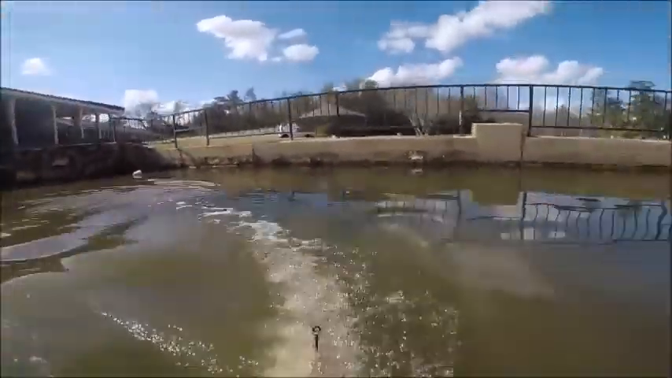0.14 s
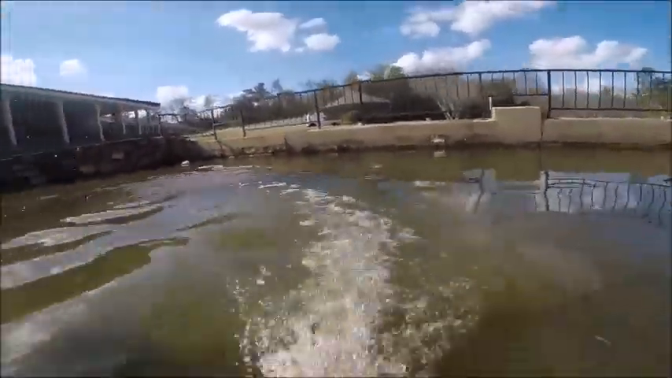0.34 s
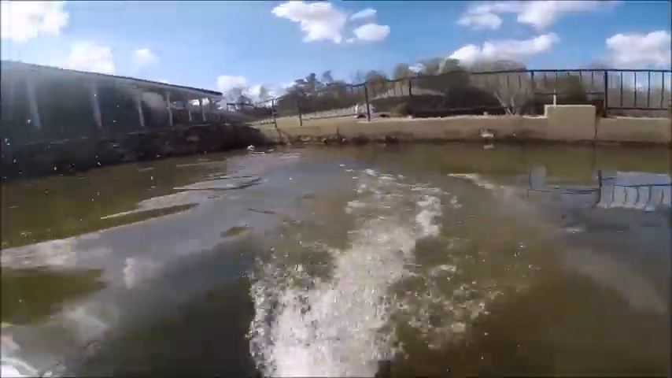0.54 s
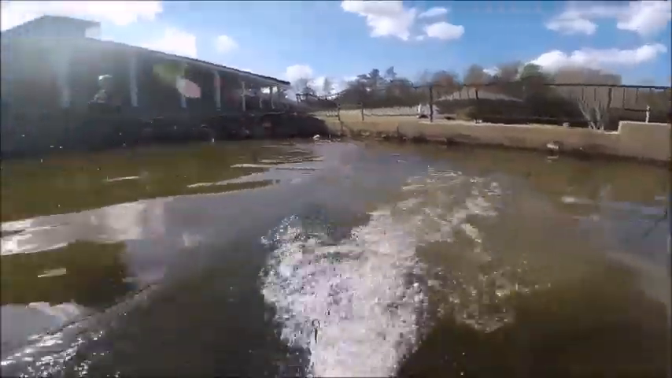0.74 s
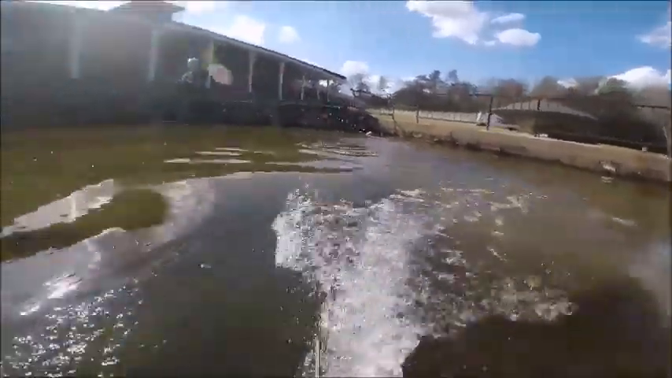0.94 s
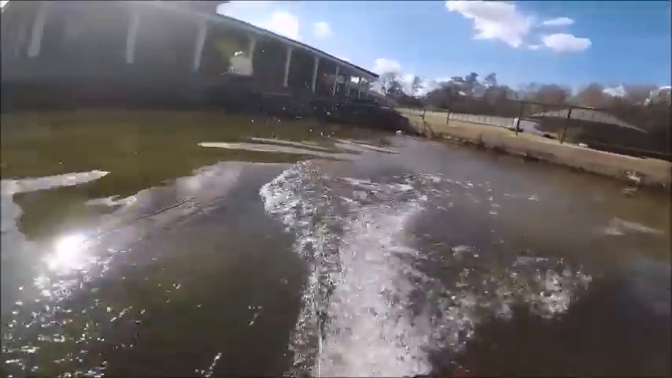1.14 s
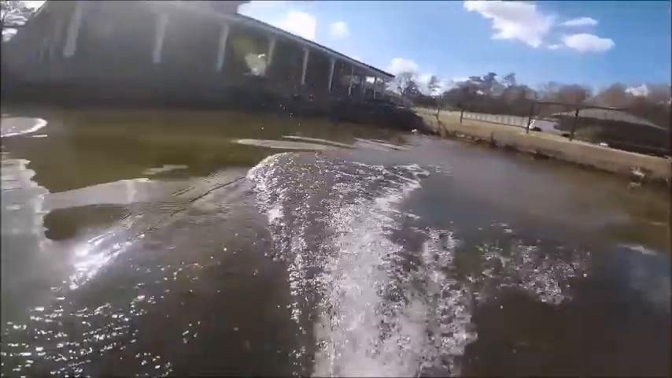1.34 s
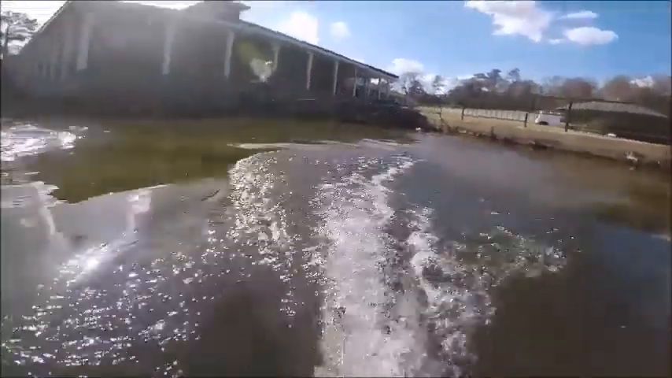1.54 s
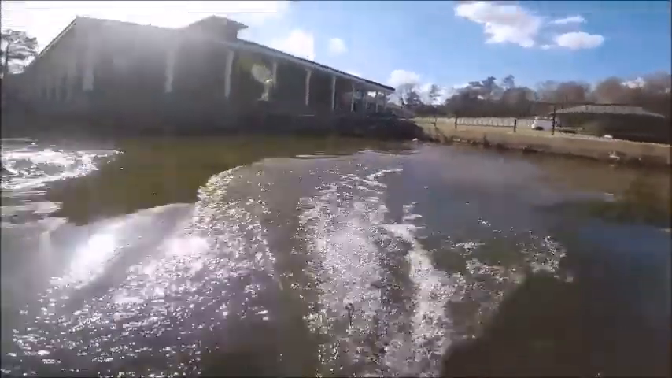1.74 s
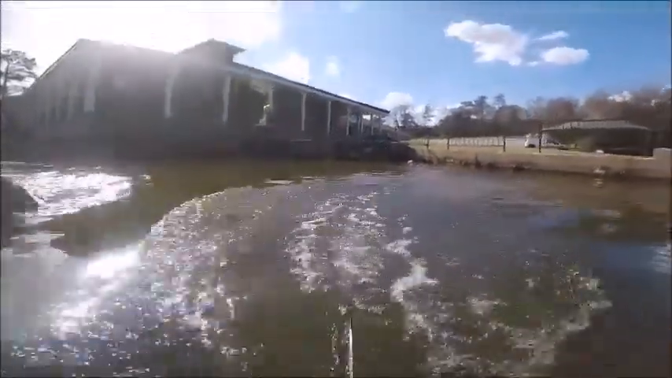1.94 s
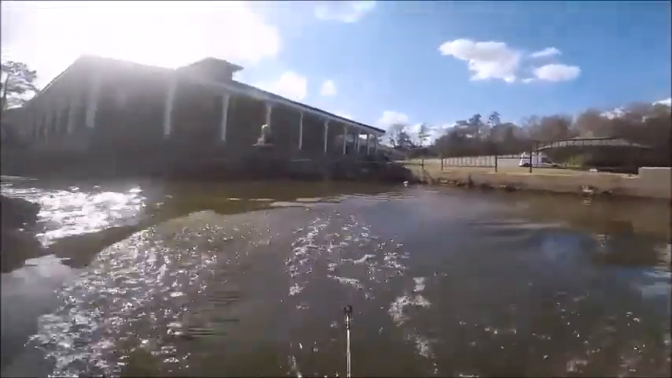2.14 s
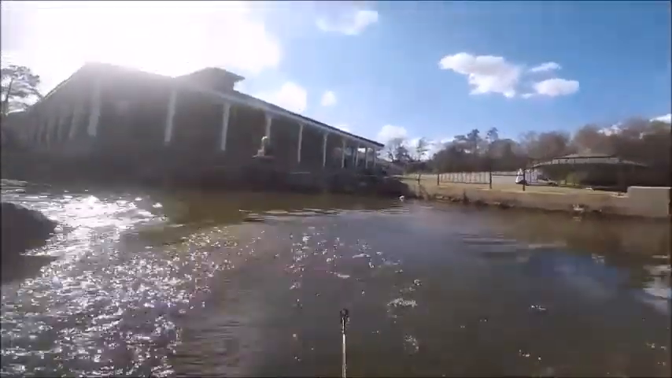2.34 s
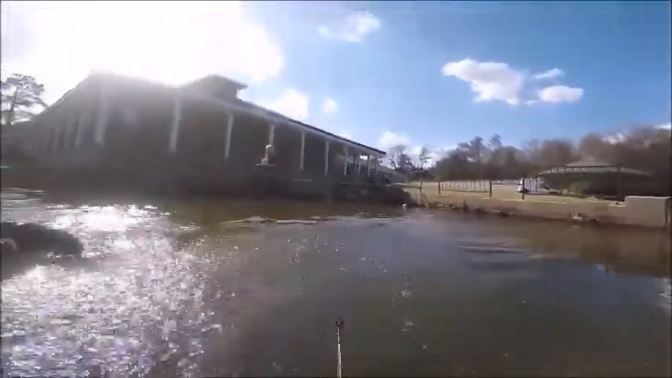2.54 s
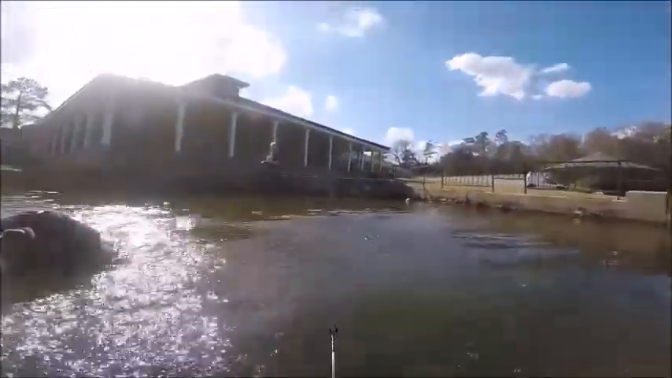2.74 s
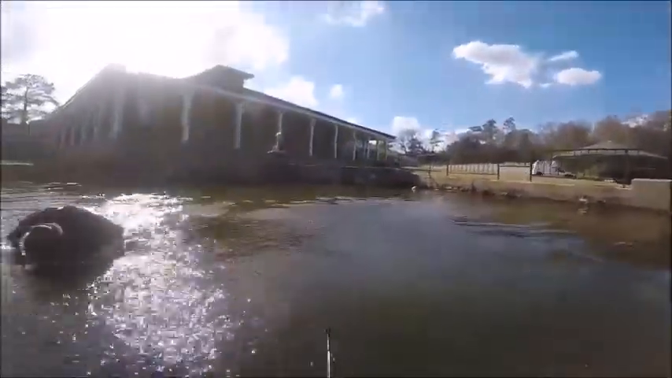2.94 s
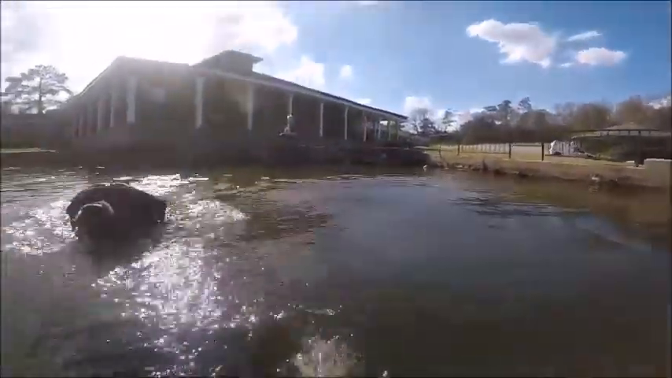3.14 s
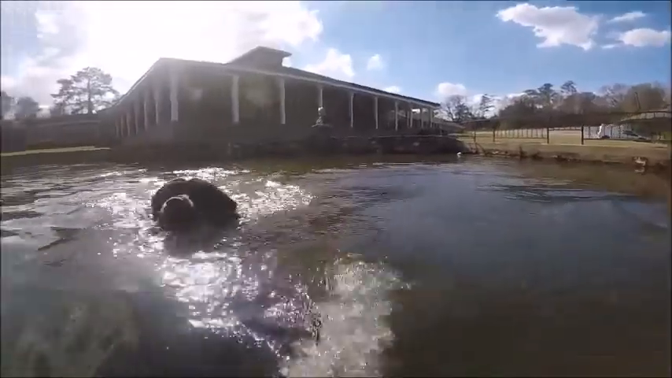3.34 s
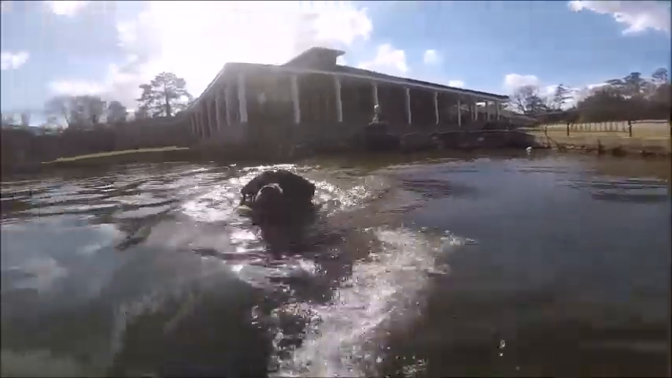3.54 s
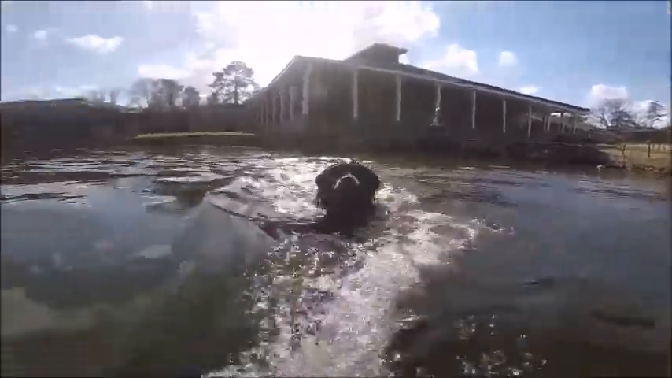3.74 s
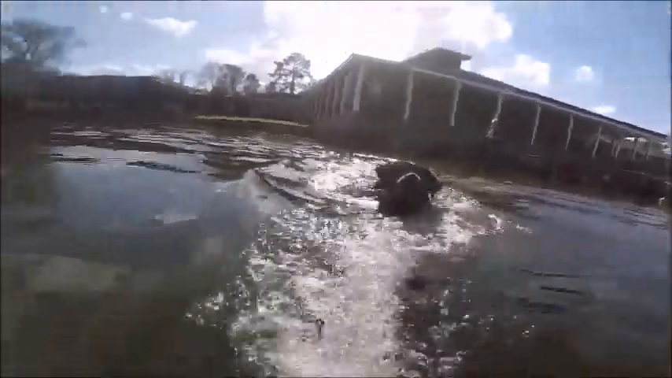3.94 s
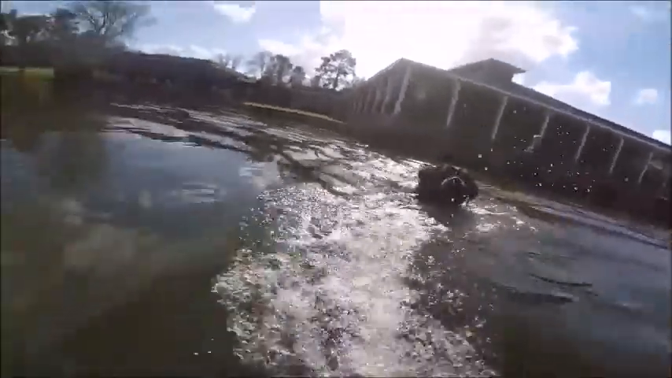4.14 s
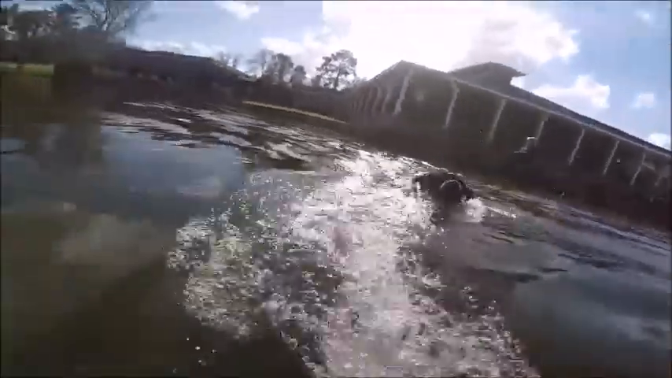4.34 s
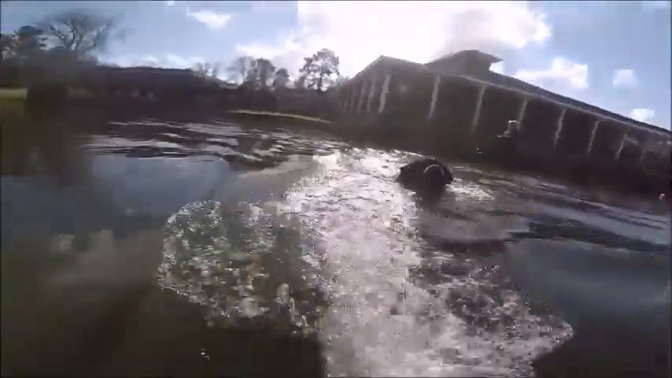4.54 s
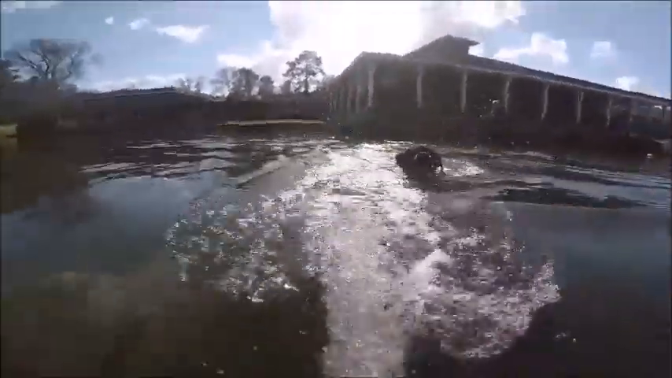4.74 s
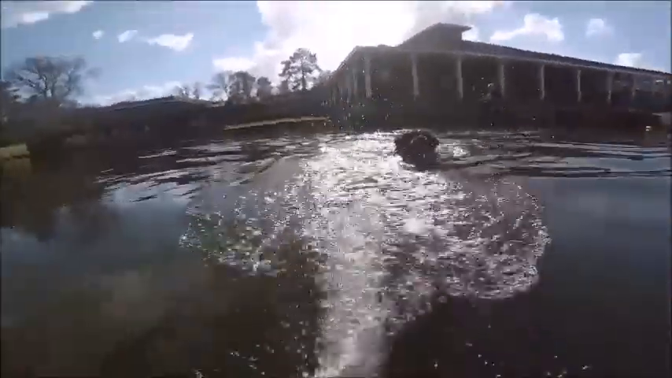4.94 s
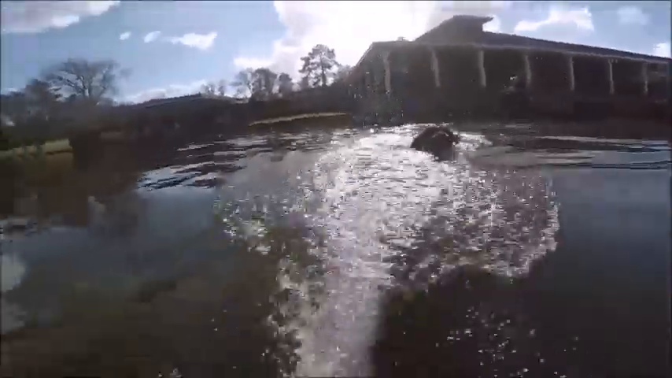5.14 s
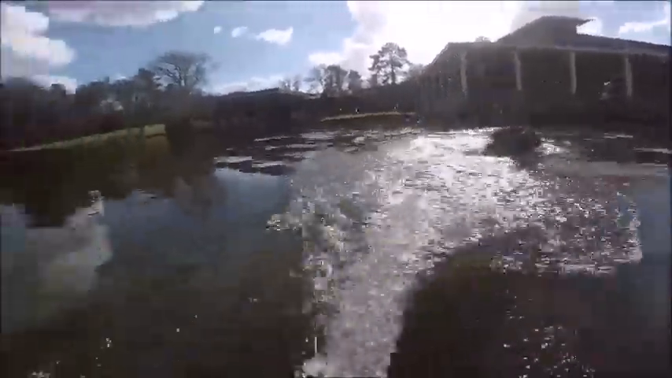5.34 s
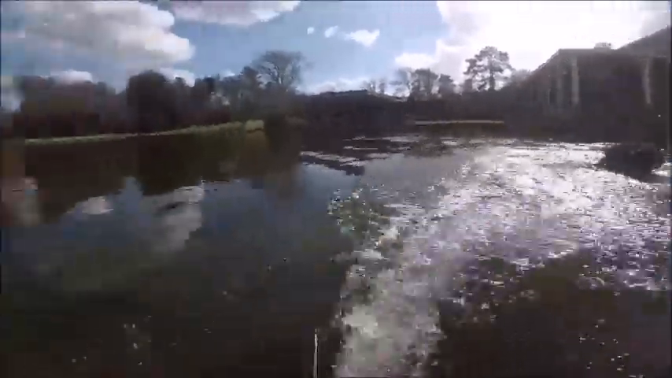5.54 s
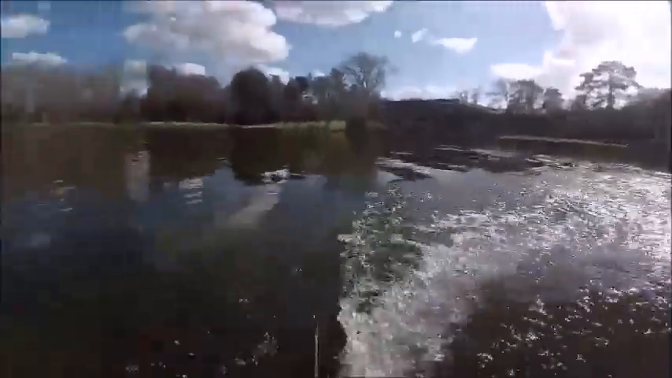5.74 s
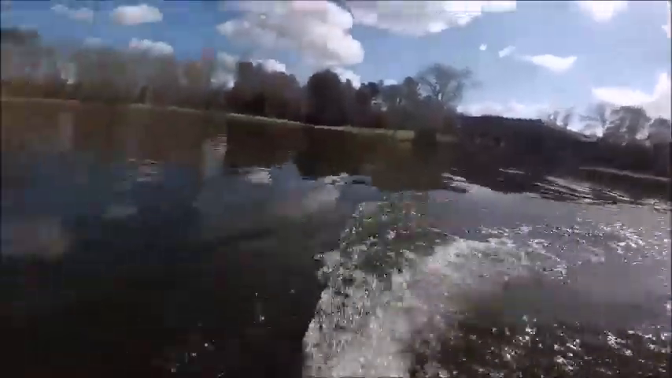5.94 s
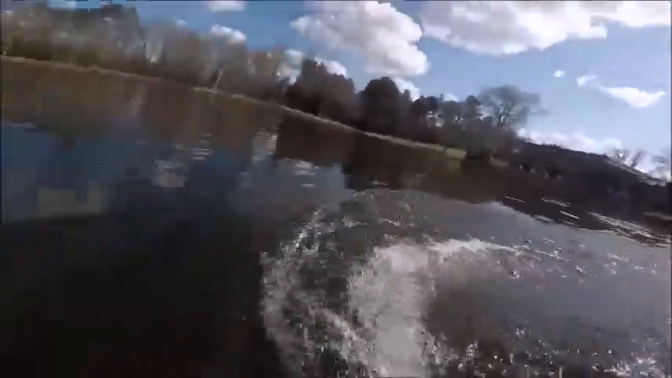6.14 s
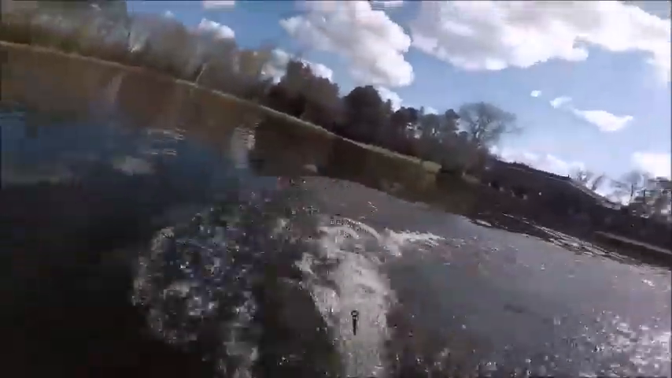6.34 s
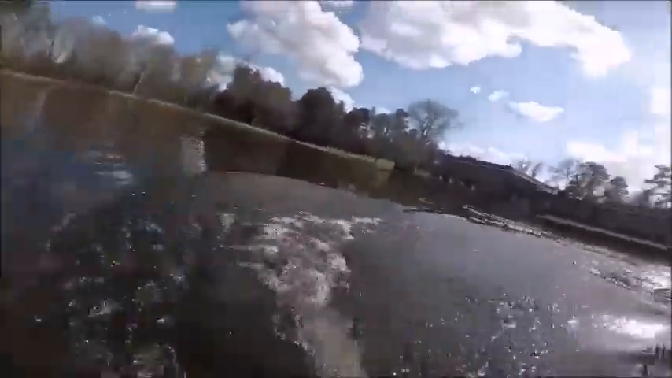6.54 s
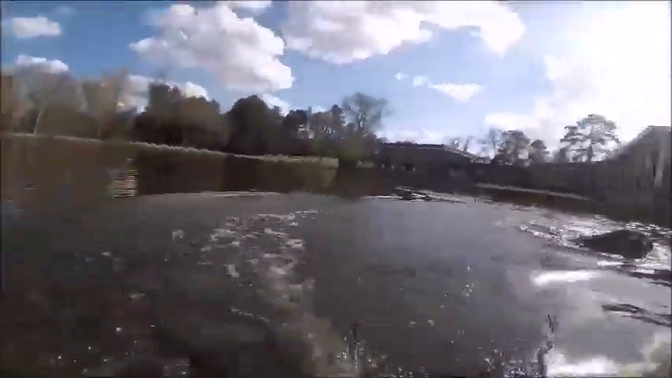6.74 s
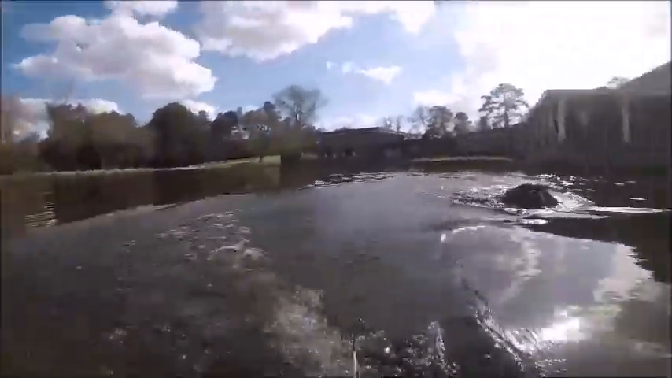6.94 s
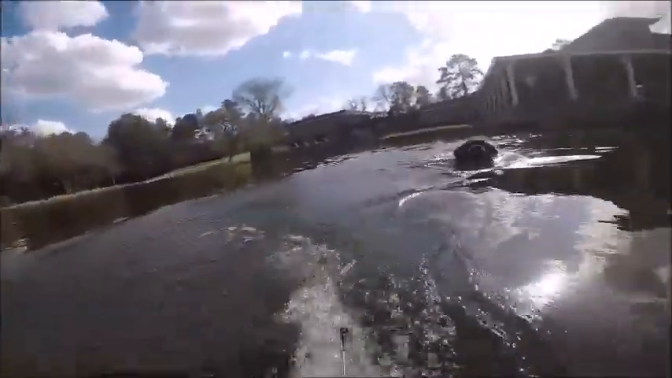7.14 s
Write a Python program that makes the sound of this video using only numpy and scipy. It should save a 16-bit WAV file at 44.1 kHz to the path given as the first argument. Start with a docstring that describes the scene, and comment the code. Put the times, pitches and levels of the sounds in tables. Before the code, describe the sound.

A low, buzzing electric hum shakes a hollow little hull while water churns beneath and a soft wake hisses. After nearly two seconds the throttle closes, leaving quiet lapping and small drips. Around three seconds the motor returns with a loud splash and gurgling growl, dips briefly, drones on, weakens amid pattering drops, and surges at the end. Close on-board microphone, outdoors, dry.

```python
"""A small electric model boat, heard from its own deck. The propeller bites at once, and the shaft shakes the
hull into a low drone while water churns underneath and a hissing wake streams away. The throttle closes and
the boat coasts through lapping ripples; it bites again with a splash, air growling in the propeller.
Last it labours through a turn, with spray pattering on the deck as wet ticks and ringing bubbles."""
import sys
import numpy as np
from scipy import signal
from scipy.fft import rfft, irfft, next_fast_len
from scipy.io import wavfile
from scipy.ndimage import uniform_filter1d, minimum_filter1d, map_coordinates

SR = 44100
rng = np.random.default_rng(int(sys.argv[2]) if len(sys.argv) > 2 else 0)


def master_out(mix):
    """Clip the mix to full scale and print it as 16-bit PCM to the path in sys.argv[1]."""
    frames = np.transpose(np.atleast_2d(mix))
    ceiling = np.clip(frames, -1, 1)
    pcm = np.round(ceiling * 32767).astype(np.int16)
    wavfile.write(sys.argv[1], SR, pcm)


N = 321930
TIME = np.arange(N) / SR


def amp(db):
    """Decibels to gain."""
    return 10 ** (np.asarray(db) / 20)


def unit(x):
    """Scale to rms 1."""
    return x / np.sqrt(np.mean(x ** 2) + 1e-20)


def colour(points, hz):
    """Gain at hz of a tone colour: (Hz, dB) points joined on a log frequency axis."""
    f, db = np.transpose(points)
    return amp(np.interp(np.log(hz + 1), np.log(f), db))


def curves(rows):
    """Automation: one value per sample for each column after the time."""
    s, *cols = np.transpose(rows)
    return [np.interp(TIME, s, c) for c in cols]


def swells(rows, attack_s, t60):
    """Attack, hold and release for (start, end, dB, ..) rows: one gain curve for each dB column."""
    gains = 0
    for start, end, *db in rows:
        attack = np.clip((TIME - start) / attack_s, 0, 1)
        release = amp(-60 * np.maximum(TIME - end, 0) / t60)
        gains = np.maximum(gains, amp(db)[:, None] * attack * release)
    return gains


def wobble(rate):
    """A smooth random curve, rate knots a second."""
    return map_coordinates(rng.standard_normal(int(N * rate / SR) + 4), [TIME * rate])


def filtered(x, response):
    """x times a response of frequency."""
    size = next_fast_len(N + SR // 2)
    return irfft(rfft(x, size) * response(np.fft.rfftfreq(size, 1 / SR)), size)[:N]


def shaped(x, points):
    """x in the given colour, rms 1."""
    return unit(filtered(x, lambda hz: colour(points, hz)))


def rush(patchy_db):
    """Noise with short patches of random gain in time and frequency, rms 1."""
    z = signal.stft(rng.standard_normal(N), nperseg=512)[2]
    field = uniform_filter1d(rng.standard_normal(z.shape), size=7, axis=0)
    field = uniform_filter1d(field, size=6, axis=1)
    noise = signal.istft(z * amp(patchy_db * unit(field)), nperseg=512)[1]
    return unit(noise[:N])


def droplets(per_second, low_hz, high_hz, cycles, spread_db):
    """A random shower of tiny damped bubbles, rms 1."""
    when, pitch, size, life = rng.random((int(per_second * N / SR), 4)).T[:, :, None]
    age = np.arange(SR // 100) / SR
    hz = low_hz * (high_hz / low_hz) ** pitch
    strength = amp(-spread_db * np.log(size + 1 / 50))  # a few far louder than the rest
    decay = np.exp(-age * hz / (cycles * (.5 + life)))
    grains = strength * np.sin(2 * np.pi * hz * age) * decay
    where = (when * N).astype(int) + np.arange(len(age))
    return unit(np.bincount(where.ravel(), grains.ravel(), N)[:N])


def add(track, s, sound):
    """Mix a sound into the track at time s."""
    part = track[max(round(s * SR), 0):][:len(sound)]
    part += sound[:len(part)]


# dull colour of water under the hull: (frequency [Hz], level [dB])
UNDERSIDE_COLOUR = [(70, -29), (130, 3), (165, -6.5), (210, -7.5), (285, -17), (370, -11), (425, -7.5),
                    (480, -9), (600, -13), (850, -26.5), (1200, -27.5), (1600, -39), (3000, -62.5),
                    (8000, -120)]
# ring of the hollow hull: (centre [Hz], width [Hz])
HOLLOW_RING = (217.4, 41)


def churn(angle, load_db, beat, ring_db, surge, level_db):
    """Water pounds the underside once a shaft turn; load above cruising makes the hollow hull ring more."""
    flow = rush(patchy_db=3.0) * (1 + beat * np.cos(angle))
    centre, width = HOLLOW_RING
    # a band-pass resonance, applied twice
    ring = unit(filtered(rng.standard_normal(N),
                         lambda f: (f * width / (centre ** 2 - f ** 2 + 1j * f * width)) ** 2))
    hollow = amp(ring_db + surge * np.maximum(load_db, 0))
    mix = (shaped(flow, UNDERSIDE_COLOUR) + hollow * ring) / np.sqrt(1 + hollow ** 2)
    return amp(load_db + level_db) * mix


# strength of the wake, before the wash and spray trims: (time [s], level [dB])
WAKE_STRENGTH = [(0, -35.5), (.45, -48.5), (1.24, -42.5), (1.54, -50.5), (1.74, -50), (1.84, -61),
                 (2.15, -61), (2.55, -60), (2.8, -55.5), (3.04, -55.5), (3.16, -41), (3.58, -43.5),
                 (3.68, -47.5), (4.13, -47), (4.24, -53), (4.44, -45.5), (5.3, -44.5), (6.1, -49),
                 (6.24, -55.5), (6.75, -55.5), (7.04, -44), (7.3, -44.5)]
# sheets of water thrown up by the hull: (start [s], end [s], wash level [dB], spray level [dB])
THROWN_SHEETS = [(1.91, 2, -52, -54), (2.195, 2.23, -50, -61), (2.33, 2.39, -54, -57),
                 (2.82, 2.88, -42, -50), (3.02, 3.05, -43, -56), (3.052, 3.07, -23, -33),
                 (3.108, 3.14, -26, -33), (3.258, 3.29, -45, -37), (4.27, 4.35, -62, -45),
                 (5.9, 5.95, -37, -54), (6.8, 6.89, -39, -48), (7.08, 7.17, -35, -44)]
# colour of the bubbling wash: (frequency [Hz], level [dB])
WASH_COLOUR = [(300, -13.5), (600, -1), (1100, -1.5), (1450, -2.5), (1900, 2.5), (2300, -3.5), (2700, -8),
               (3300, -14.5), (4500, -23), (8000, -64.5), (12000, -100)]
# bright colour of spray and splats: (frequency [Hz], level [dB])
SPRAY_COLOUR = [(2400, -24.5), (3300, -12.5), (4000, -7), (5100, -2), (5700, -1), (6500, -0.5),
                (7300, -5.5), (8300, -14.5), (9000, -10.5), (10200, -15), (11300, -26), (15000, -46)]


def wake(angle, drive, beat, drop_share, slack_share, wash_db, spray_db):
    """Bubbling wash and fine spray: a rush that breaks up into drops as the throttle closes."""
    stream = amp(curves(WAKE_STRENGTH)[0])
    sheet_wash, sheet_spray = swells(THROWN_SHEETS, attack_s=0.024, t60=0.083)
    share = np.clip(drop_share + slack_share * (1 - drive), 0, 1)
    rush_gain, drop_gain = np.sqrt(1 - share), np.sqrt(share)
    bubbles = droplets(per_second=900, low_hz=614, high_hz=3590, cycles=3.6, spread_db=3.5)
    drops = droplets(per_second=800, low_hz=3500, high_hz=10000, cycles=4, spread_db=3)
    pulse = unit(1 + beat * np.cos(angle))  # the rush swells once a turn
    wash = shaped(rush_gain * rush(patchy_db=1.5) * pulse + drop_gain * bubbles, WASH_COLOUR)
    spray = shaped(rush_gain * rush(patchy_db=1.5) * pulse + drop_gain * drops, SPRAY_COLOUR)
    clumps = amp(4.4 * share * (wobble(60) + wobble(14)))
    wash_gain = np.hypot(amp(wash_db) * stream, sheet_wash)
    spray_gain = np.hypot(amp(spray_db) * stream, sheet_spray)
    return clumps * (wash_gain * wash + spray_gain * spray)


# hoarse colour of air in the propeller: (frequency [Hz], level [dB])
AIR_COLOUR = [(200, -66), (500, -22), (700, -3.5), (830, -0.5), (980, -10), (1300, -17.5), (1800, -15),
              (2400, -33.5), (8000, -100)]


def ventilation(angle, drive, bite, load_db, beat, gulp_db, bite_db, cruise_db):
    """The propeller gulps air and chops it into a growl: loudly as it bites, faintly under steady load."""
    chopped = shaped(rush(patchy_db=4.0) * (1 + beat * np.cos(angle)), AIR_COLOUR)
    growl = unit(chopped * amp(gulp_db * wobble(45)))
    return np.hypot(amp(bite_db) * bite, amp(cruise_db + load_db) * drive ** .2) * growl


# the hull rocking on ripples: (time [s], level [dB])
ROCKING_LEVEL = [(0, -20), (.25, -34), (1.7, -35), (1.85, -26), (2.3, -33), (2.75, -38.5), (3.04, -35),
                 (3.08, -12.5), (3.3, -30), (4.7, -39), (5.3, -28), (6.3, -33.5), (7.3, -26)]
# low colour of the rocking: (frequency [Hz], level [dB])
SWELL_COLOUR = [(10, -11.5), (30, 0), (60, -0.5), (95, 8.5), (140, -1.5), (200, -10), (400, -28.5),
                (3000, -120)]
# ripples slapping the hull: (time [s], level [dB], pitch [Hz], t60 [s])
RIPPLE_SLAPS = [(0.011, -1, 194, 0.075), (0.867, -8, 76.6, 0.14), (1.401, 1, 70.37, 0.057),
                (1.741, -9.5, 378, 0.055), (1.946, -14, 91, 0.059), (2.222, -25, 435, 0.15),
                (2.246, -23, 372, 0.1), (2.271, -3.5, 91, 0.073), (2.768, -19, 395, 0.029),
                (3.063, -7, 594.6, 0.036), (3.073, -7, 77, 0.15), (3.09, 0, 234, 0.13),
                (3.125, 2, 154, .18), (3.605, -23, 175, 0.11), (4.929, -7, 76.9, 0.13),
                (5.29, -10, 81.74, 0.11), (6.812, -1.5, 190.7, 0.085), (7.055, -3, 184.3, 0.13),
                (7.083, 0, 182.2, 0.14)]


def rocking():
    """The hull wallows in low noise and takes a hollow slap, a damped tone, from the larger ripples."""
    out = amp(curves(ROCKING_LEVEL)[0]) * shaped(rng.standard_normal(N), SWELL_COLOUR)
    age = np.arange(SR // 4) / SR
    for s, db, hz, t60 in RIPPLE_SLAPS:
        soft = 1 - np.exp(-age * hz * 2)
        add(out, s, amp(db - 60 * age / t60) * soft * np.sin(2 * np.pi * hz * age))
    return out


# the hum dips briefly: (time [s], depth [dB], time to fall [s])
HUM_DIPS = [(0.128, 5, 0.0067), (0.879, 25, 0.0076), (1.0, 8, 0.034), (3.278, 7, 0.011), (3.448, 9, 0.0087),
            (3.606, 1, 0.0085), (5.019, 10, 0.021), (5.46, 16, .014), (5.57, 5, 0.072)]
# hull resonances that the low shaft orders slide through: (centre [Hz], width [Hz], level [dB])
RESONANCES = [(218.3, 28, -18.5), (401.3, 29.5, -27), (474.7, 14, -27)]
# shaft orders two to four: (level away from any resonance [dB], gain per dB of load [dB])
LOW_ORDERS = [(-39, 0.24), (-34, 0.71), (-36, 0.55)]
# one overtone swells for a moment: (time [s], half length [s], shaft order, gain [dB])
OVERTONE_RISES = [(.65, 0.2, 2, 7.5), (1.14, .165, 4, 8), (3.36, 0.21, 3, 6.5), (3.75, .08, 4, 3.5),
                  (4.95, 0.25, 4, 7), (5.84, .13, 3, 10), (6.09, 0.16, 2, 5.5), (6.02, 0.092, 4, 6.5),
                  (6.39, 0.03, 2, 8), (6.78, .18, 4, 9)]


def drone(angle, speed, drive, load_db, hum_db, slack_db, flutter_db, sixth_db):
    """Shaft unbalance and blades shake the hull: overtones swell at its resonances, low throttle wavers."""
    dip_db = 0
    for s, depth, fall in HUM_DIPS:
        pace = np.where(TIME < s, fall, fall * 3.2)  # recovers more slowly than it falls
        dip_db = dip_db + depth * np.exp(-((TIME - s) / pace) ** 2)
    waver_db = (.15 + slack_db * (1 - drive)) * wobble(30)
    hum = drive * amp(hum_db - dip_db + waver_db) * np.cos(angle)
    blades = drive ** 0.59
    for order, (base_db, per_load) in enumerate(LOW_ORDERS, 2):
        power = amp(base_db) ** 2
        for hz, width, db in RESONANCES:
            power = power + amp(db) ** 2 / (1 + ((order * speed - hz) / width) ** 2) ** 2
        rise_db = sum(db * np.exp(-((TIME - s) / half) ** 4)
                      for s, half, k, db in OVERTONE_RISES if round(k) == order)
        flutter = flutter_db * unit(wobble(9) + wobble(55))
        strength = blades * np.sqrt(power) * amp(rise_db + per_load * load_db + flutter)
        hum += strength * np.cos(order * angle + (order - 1) * np.pi / 2)
    # two blades: the sixth order swells with the fourth, whose strength the loop leaves behind
    sixth = amp(sixth_db) * drive * strength * np.sin(6 * angle)
    return np.sqrt(2) * (hum + sixth)


WHINE_ORDER = 16  # cycles per shaft turn
PANEL_HZ, PANEL_WIDTH_HZ = 1890, 50


def whine(angle, singing, flutter_db):
    """A high order of the motor sings whenever it meets the resonance of a hull panel."""
    return np.sqrt(2) * singing * amp(flutter_db * wobble(25)) * np.sin(WHINE_ORDER * angle)


# fixed hull resonances that colour the drive: (frequency [Hz], level [dB])
DRIVE_COLOUR = [(450, -5.5), (590, 3), (730, -3.5), (850, -12), (960, -6), (1080, -9), (1180, -13),
                (1300, -24.5), (1550, -18), (1900, -13), (2150, -29), (3000, -40.5)]


def buzz(angle, speed, drive, bite, singing, rough, air_rough, flutter_db, level_db, bite_db, singing_db):
    """High drive orders slide through hull resonances and grow with the whine; air makes turns uneven."""
    airy = np.minimum(1, .06 + 1.5 * bite + .3 * (1 - drive))
    uneven = angle + (rough + air_rough * airy) * wobble(110)
    lines = np.zeros(N)
    for order in range(5, 25):
        flutter = amp(flutter_db * unit(wobble(6) + wobble(30)))
        strength = colour(DRIVE_COLOUR, order * speed) * flutter
        lines += strength * np.cos(order * uneven + rng.uniform(0, 2 * np.pi))
    running = drive ** .85 * np.hypot(amp(level_db), amp(bite_db) * bite)
    return (running + amp(singing_db) * singing) * unit(lines)


# drops and splashes on the deck: (time [s], level before the overall trim [dB], starting bubble pitch [Hz])
DECK_DROPS = [(.188, -21.5, 2100), (2.201, -37, 775), (2.212, -37, 1950), (2.934, -32, 1360),
              (3.044, -26.5, 1018), (3.065, -15, 1673), (3.112, -13, 4950), (3.139, -14, 1500),
              (6.364, -21.5, 7270), (6.476, -28, 2148), (6.53, -29, 2860), (6.566, -26, 2222),
              (6.592, -20, 1702), (6.622, -26, 3900), (6.654, -22, 2112), (6.69, -27, 5187),
              (6.698, -27, 2726), (6.822, -22, 1190), (6.944, -26.5, 2410), (6.99, -21.5, 2572),
              (7.085, -14, 4934), (7.11, -16, 1968)]
# colour of water hitting the deck: (frequency [Hz], level [dB])
DECK_COLOUR = [(300, -55), (1100, 7), (1500, -7), (2300, 6), (3200, -15), (4000, -2.5), (5200, -11.5),
               (8000, -10), (10500, -37), (14000, -43)]


def splashes(cycles, rise, splat_t60, level_db):
    """A drop lands with a wet splat and leaves a bubble whose pitch rises; small bubbles die sooner."""
    out, age = np.zeros(N), np.arange(SR // 16) / SR
    wet = shaped(rng.standard_normal(N), SPRAY_COLOUR) / 2 + shaped(rng.standard_normal(N), DECK_COLOUR)
    for s, db, hz in DECK_DROPS:
        bubble = np.exp(-age * hz / cycles) * np.sin(2 * np.pi * hz * age * (1 + rise * age))
        splat = amp(-60 * age / splat_t60) * wet[round(s * SR):][:len(age)] / 2
        onset = 1 - np.exp(-age / 0.0012)
        add(out, s, amp(db + level_db) * onset * (bubble + splat))
    return out


# showers of spray landing on the deck in the turn: (start [s], end [s], level [dB])
SPRAY_SHOWERS = [(6.41, 6.55, -49), (6.55, 6.7, -45), (6.8, 6.88, -42), (6.98, 7.08, -40),
                 (7.08, 7.14, -36)]


def sputter(per_second, spread_db, burst_t60, bubble_share):
    """Thrown water lands on the deck as an irregular hail of short wet ticks and ringing bubbles."""
    when, size = rng.random((int(per_second * N / SR), 2)).T
    hits = np.bincount((when * N).astype(int), amp(-spread_db * np.log(size + 1 / 20)), N)
    age = np.arange(SR // 20) / SR
    bursts = signal.fftconvolve(hits, amp(-60 * age / burst_t60))[:N]
    ticks = shaped(bursts * rush(patchy_db=0.5), DECK_COLOUR)
    bubbles = droplets(per_second=160, low_hz=1700, high_hz=5200, cycles=7, spread_db=4)
    landing, = swells(SPRAY_SHOWERS, attack_s=0.017, t60=0.46)
    return landing * (np.sqrt(1 - bubble_share) * ticks + np.sqrt(bubble_share) * bubbles)


# shaft rotation: (time [s], speed [turns/s])
SHAFT_SPEED = [(0, 102), (.18, 119), (.3, 115), (.41, 122), (.74, 124.8), (.95, 122.4), (1.29, 119),
               (1.5, 118.6), (1.71, 117), (1.76, 121), (1.86, 110), (3.17, 107.6), (3.41, 116),
               (3.446, 124.5), (3.586, 128.7), (3.628, 116), (3.76, 115.6), (3.95, 117), (4.12, 120.5),
               (4.26, 140), (4.34, 113), (4.82, 122), (5.416, 121.4), (5.49, 138.5), (5.8, 134.5),
               (5.926, 124.4), (6, 113), (6.14, 111.5), (6.3, 133), (6.46, 104.3), (6.9, 112.3),
               (7.05, 102), (7.13, 113), (7.3, 127)]
# how hard the water bears on hull and propeller: (time [s], level over cruising [dB])
WATER_LOAD = [(0, 15), (.3, -1.5), (1, -2), (1.35, -10), (1.66, -9.5), (1.76, -5.5), (1.84, -19),
              (2.16, -28), (2.25, -8), (2.36, -22), (3.02, -18), (3.07, 17), (3.22, 11.5), (3.7, 4.5),
              (4.15, -0.5), (4.26, -5), (4.35, 5), (4.52, -4), (5.4, -0.5), (5.95, 4.5), (6.3, -2),
              (6.95, 3.5), (7.11, 10.5), (7.3, 2)]
# stretches of steady throttle: (opens [s], closes [s], drive level [dB], whine level [dB])
THROTTLE_HOLDS = [(.01, 1.752, 0, -42), (3.14, 4.155, -.5, -51), (4.16, 4.31, -19, -70),
                  (4.32, 6.12, 0, -52), (6.11, 6.56, -16, -70), (6.56, 7.12, -11, -70), (7.12, 7.3, 0, -60)]
# the propeller bites and sucks air until the boat is under way: (start [s], end [s], level [dB])
PROPELLER_BITES = [(0, .26, -4), (3.06, 3.3, 0), (7.07, 7.14, -4)]


def scene():
    """Speed, throttle, load and the propeller's bites drive motor and water together."""
    speed, = curves(SHAFT_SPEED)
    load_db, = curves(WATER_LOAD)
    drive, whining = swells(THROTTLE_HOLDS, attack_s=.035, t60=.15)
    singing = whining / np.sqrt(1 + ((WHINE_ORDER * speed - PANEL_HZ) / PANEL_WIDTH_HZ) ** 4)
    bite, = swells(PROPELLER_BITES, attack_s=.04, t60=1.7)
    angle = 2 * np.pi * np.cumsum(speed * (1 + .0015 * wobble(45))) / SR  # shaft angle [rad]
    water = churn(angle, load_db, beat=.45, ring_db=-7, surge=0.14, level_db=-27.5)
    water += wake(angle, drive, beat=.06, drop_share=0.15, slack_share=0.12, wash_db=3.5, spray_db=-.5)
    water += ventilation(angle, drive, bite, load_db, beat=0.16, gulp_db=3, bite_db=-27.5, cruise_db=-43.5)
    water += rocking()
    motor = drone(angle, speed, drive, load_db, hum_db=-8.0, slack_db=4.0, flutter_db=3.5, sixth_db=-17)
    motor += whine(angle, singing, flutter_db=0.5)
    motor += buzz(angle, speed, drive, bite, singing, rough=0.018, air_rough=0.096, flutter_db=4.0,
                  level_db=-34.5, bite_db=-28.5, singing_db=-8.5)
    drops = splashes(cycles=6.4, rise=3.2, splat_t60=.012, level_db=-1.5)
    drops += sputter(per_second=220, spread_db=5.5, burst_t60=.02, bubble_share=.2)
    return (motor + water + drops)[None]


TOP_HZ = 15500


def record(dry):
    """A limiter holds peaks to 1.1 times full scale, then everything above the band limit is cut."""
    needed = np.minimum(1, 1.1 / (np.abs(dry[0]) + 1e-9))
    gain = uniform_filter1d(minimum_filter1d(needed, size=700), size=600)
    return filtered(dry[0] * gain, lambda hz: hz < TOP_HZ)[None]


dry = scene()
out = record(dry)
master_out(out)
```